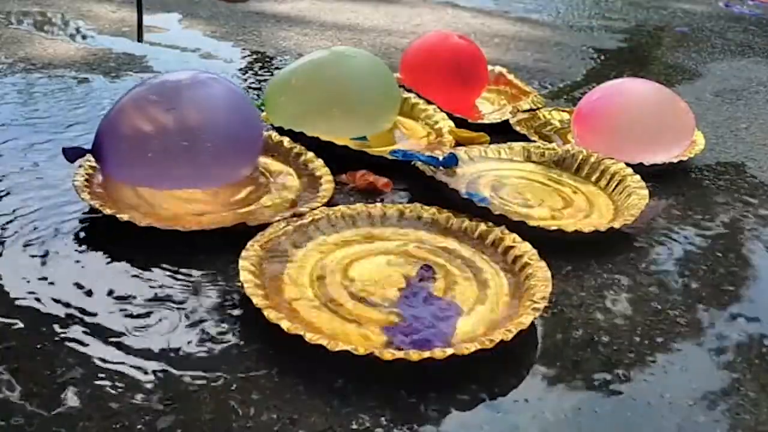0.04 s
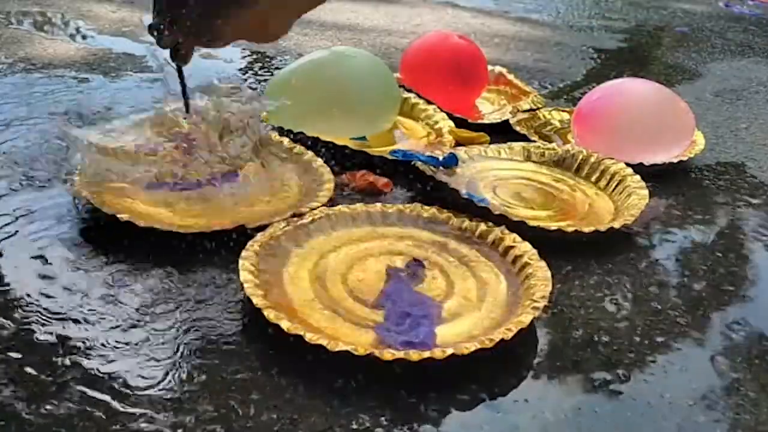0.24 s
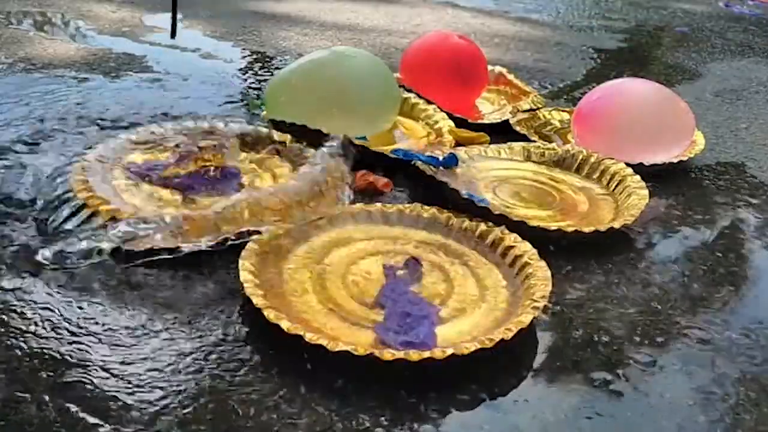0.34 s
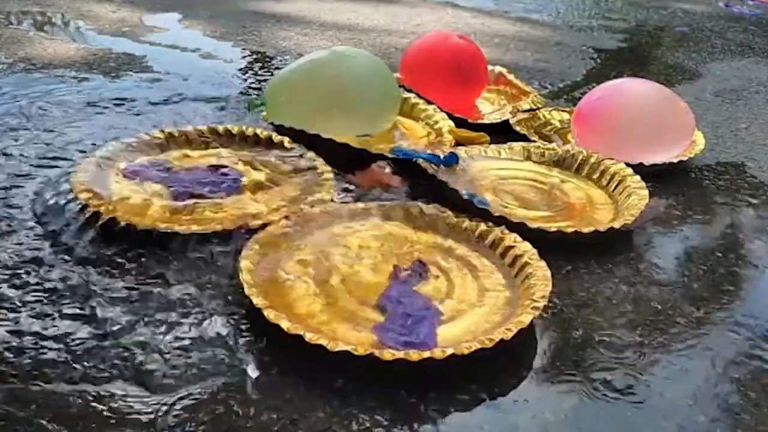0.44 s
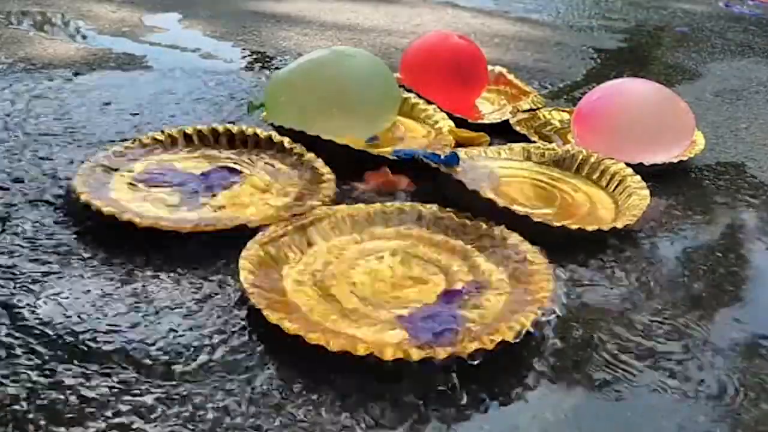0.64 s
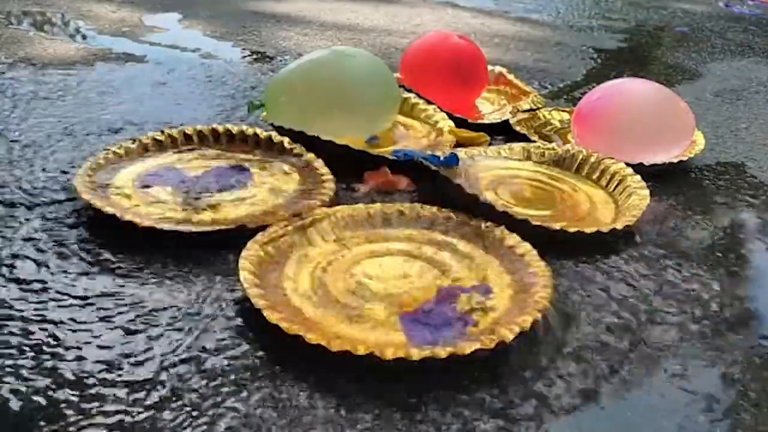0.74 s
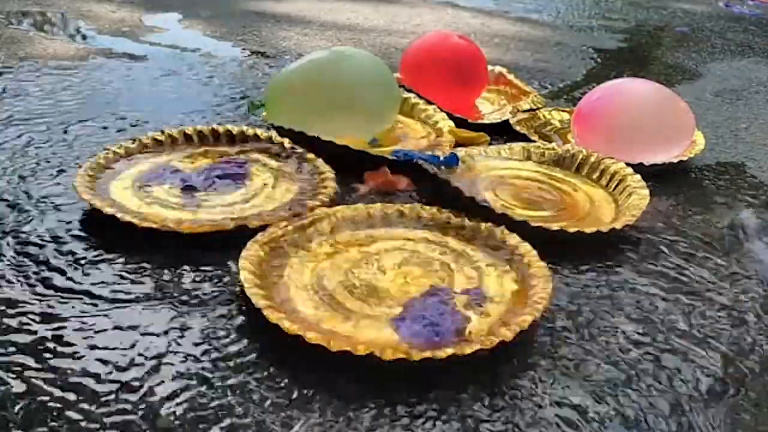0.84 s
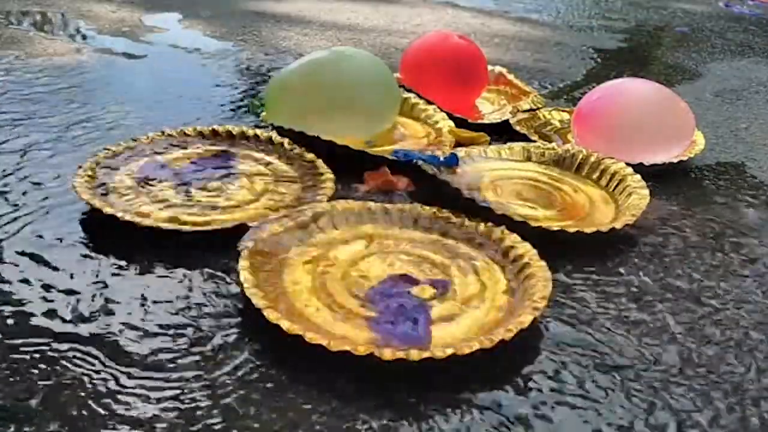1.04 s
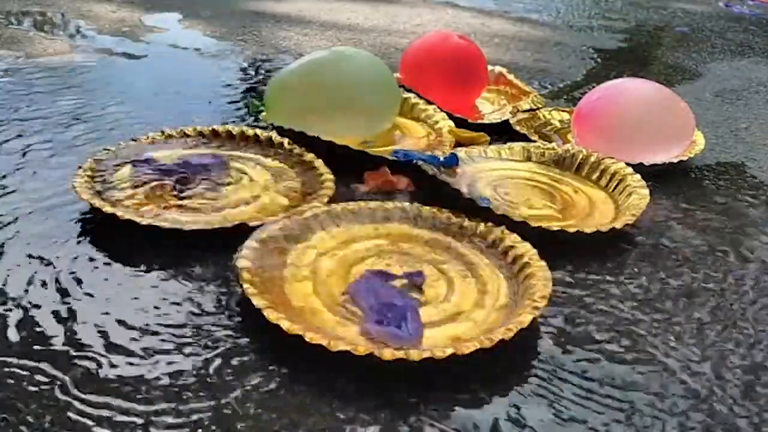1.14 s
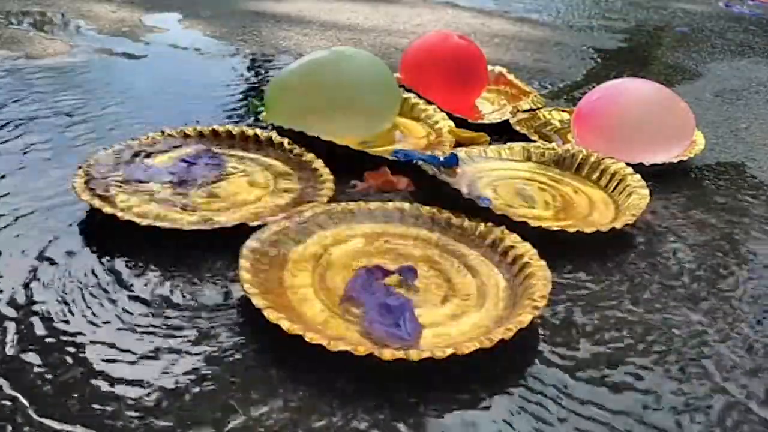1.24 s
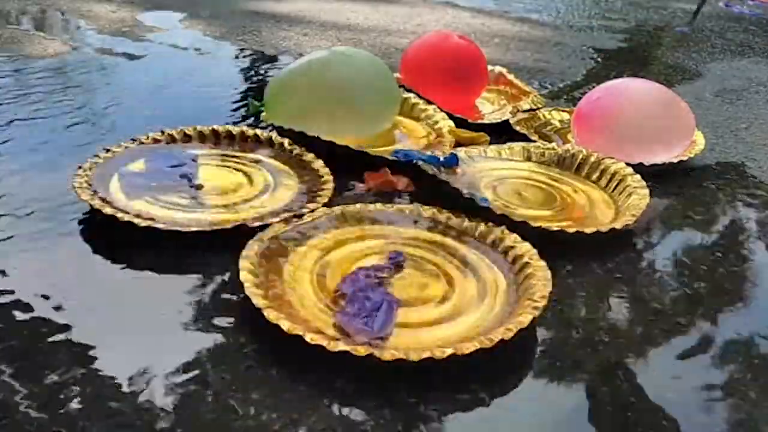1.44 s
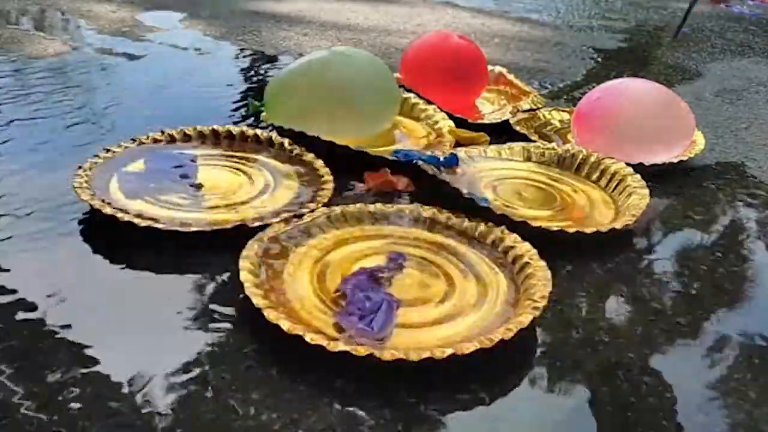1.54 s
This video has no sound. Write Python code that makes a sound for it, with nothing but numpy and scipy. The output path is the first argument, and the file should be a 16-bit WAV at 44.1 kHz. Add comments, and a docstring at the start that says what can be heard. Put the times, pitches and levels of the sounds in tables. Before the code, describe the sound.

A water balloon bursts with a sharp snap, water slapping a foil plate and wet pavement outdoors

```python
"""Low wind puffs over a faint outdoor rumble and hiss; then a water balloon pricked over a foil-paper plate.
The skin snaps (ringing cracks, spray and a thump), and water slaps plate and pavement in surges
(patchy noise plus a crowd of tiny rings). Trapped air plops and slaps ring as short gliding tones, fine
spray fizzes (noise), and droplets trickle away as ticks with puffs of noise. Two ports hear it close by."""
import sys
import numpy as np
from scipy import signal
from scipy.fft import rfft, irfft, next_fast_len
from scipy.io import wavfile
from scipy.ndimage import uniform_filter1d

SR = 44100
rng = np.random.default_rng(int(sys.argv[2]) if len(sys.argv) > 2 else 0)


def unload_audio(sound):
    """Save the sound as a 16-bit wav file, at the path given as the first command line argument."""
    columns = np.transpose(np.atleast_2d(sound))
    # keep every value between -1 and 1, then stretch to whole-number steps
    steps = np.round(np.clip(columns, -1, 1) * 32767)
    wavfile.write(sys.argv[1], SR, steps.astype(np.int16))


N = 70560

# Colours are relative: noise() scales to rms 1. Source levels are ahead of ports().
# Outdoor noise colour: [freq_hz, density_db_per_hz]
AIR_COLOUR = [(70, -25), (150, -5.5), (300, -12), (600, -17.5), (3300, -23.5), (9000, -33), (12800, -23),
              (15900, -33)]
# Outdoor port balance: [freq_hz, left_over_right_db]
AIR_BALANCE = [(100, 1), (8000, -2), (13000, 4)]
# Outdoor left-right likeness: [freq_hz, correlation]
AIR_ALIKE = [(150, 0.68), (1200, 0.065)]
AIR_DB = -51.5
# Wind puffs: [time_s, level_db]
WIND_LEVEL = [(0, -59), (.05, -48), (.13, -52), (.18, -62), (.4, -89), (.6, -59.5), (1.15, -66.5),
              (1.255, -48), (1.29, -53), (1.34, -52.5), (1.6, -61)]
# Wind puff colour: [freq_hz, density_db_per_hz]
WIND_COLOUR = [(25, -42), (85, 7), (250, -32.5)]

# Fine spray: [time_s, level_db]
FIZZ_LEVEL = [(.2, -63), (.5, -74), (.65, -48), (.8, -51.5), (1.05, -62.5), (1.6, -72)]
# Fine spray colour: [freq_hz, density_db_per_hz]
FIZZ_COLOUR = [(3000, -86), (6000, 1.5), (9000, -0.5), (16000, -8.5)]

# Late droplets landing: [start_s, level_db, pitch_hz]
DROPS = [(0.7513, -37.5, 13300), (0.7786, -36.5, 2100), (0.7977, -35, 7200), (0.918, -38, 2030),
         (0.9313, -39, 1420), (0.98, -39.5, 11200), (1.077, -40, 5960), (1.274, -40, 12300),
         (1.334, -44, 12400), (1.4196, -36, 2030)]
TICK_PEAK_S, TICK_DB, TICK_TILT_DB_PER_OCT = .0003, 1.5, -.8  # first contact; level over the row at 1 kHz
PUFF_RISE_S, PUFF_T60_AT_1KHZ_S = 0.0019, 0.026
PUFF_WIDTH_LN, PUFF_DB = 0.23, -7  # half width in ln(freq); level re the row

# Short tones, air pockets that plop and brief rings of the slaps:
# [start_s, pitch_hz, level_db, hold_s, pitch_rise_share]
TONES = [(.281, 1390, -33.5, 0.0042, -0.048), (.3755, 2750, -26, .008, 0.03),
         (0.371, 465, -35.5, 0.016, -0.04), (0.372, 807, -34.5, .006, -0.011),
         (0.4384, 887, -13, 0.0085, 0.178), (.439, 358.3, -33, 0.021, -0.0058),
         (.44, 591, -35.5, 0.024, 0.0042), (0.441, 1500, -28, 0.009, 0.08), (.456, 1480, -31, .012, -.04),
         (.462, 850, -32, 0.016, 0.25), (0.4905, 2330, -26.5, 0.004, 0.02), (.5, 1850, -30, .004, .01),
         (.485, 430, -41, .05, 0.26), (0.5455, 1720, -34, 0.009, 0.01), (.556, 792, -41.5, 0.0065, 0.0093),
         (.559, 1910, -34, 0.002, .04), (.585, 2650, -35, 0.003, 0.04), (.3037, 3450, -21.5, .001, 0.01)]
TONE_ATTACK_S, TONE_MIN_GLIDE_S = 0.00023, 0.0021
TONE_T60_CYCLES = 51  # cycles of the row's pitch to lose 60 dB after the hold
FLUTTER_SHARE, FLUTTER_HZ = .24, 250  # pockets deform as they ring

# Surges of falling water: [time_s, level_db]
SPLASH_LEVEL = [(.13, -58), (.218, -50.5), (.23, -27), (.25, -35.5), (.27, -35.5), (.3, -29), (.33, -32),
                (.36, -43.5), (.39, -37.5), (.43, -32.5), (.45, -38.5), (.476, -32.5), (.494, -29.5),
                (.515, -36), (.54, -40.5), (.555, -42), (.59, -43.5), (.8, -58.5), (1.6, -61)]
# Splash colour: [freq_hz, density_db_per_hz]
SPLASH_COLOUR = [(120, -48), (268, -25), (481, -8), (1270, -16.5), (3470, -3), (8830, -14.5),
                 (12500, -13.5), (15900, -35)]
GRAINS_PER_S, GRAIN_HZ, GRAIN_SPREAD_LN = 10000, 3600, .55
GRAIN_DECAY_CYCLES, GRAIN_SCATTER_DB, GRAIN_DB = 4, 2.5, -4.5  # decay to 1/e; level re the rush
CLUMP_DB, CLUMP_HZ = 1.8, 120  # droplets land in clumps: rms depth, speed limit

# Sharp bursts, tearing skin first, then slaps:
# [start_s, crack_level_db, tilt_db_per_octave, spray_level_db, spray_hold_s, spray_t60_s]
SNAPS = [(.2310, -5, .5, -20.5, .008, .035), (.3685, -11.5, -.5, -23, .005, .06),
         (.4382, -26, -2.5, -29, .004, .04)]
# Rings within a crack: [freq_hz, level_db, time_to_peak_s]
CRACK_RINGS = [(350, -24, .0015), (900, -13, .0008), (2800, -7, .0005), (4200, -2, .0004),
               (6500, -1, .0004), (9600, -4, .0003), (13000, -7, .0003)]
SPRAY_RISE_S, SPRAY_TILT_DB_PER_OCT = .0012, 2.8  # tilt added to the row's
THUMP_HZ, THUMP_DB, THUMP_T60_S = 127, -29, 0.03

# Near-water port balance: [freq_hz, left_over_right_db]
NEAR_BALANCE = [(60, 2), (500, 2.5), (7500, -1.5), (10400, 7.5), (15000, 25.5)]
# Near-water port phase: [freq_hz, left_lead_rad]
NEAR_PHASE = [(20, 0.32), (860, 0.73), (2330, 0.44), (4650, 6.43), (7240, 19.9), (15600, 27.4)]
# Near-water left-right likeness: [freq_hz, correlation]
NEAR_ALIKE = [(100, 0.077), (600, 0.82), (2500, 0.057), (10000, 0.2)]
TOP_HZ = 15900


def amp(db):
    """Decibels to linear gain."""
    return 10 ** (np.asarray(db) / 20)


def unit(x):
    """Scale to rms 1 over the whole array."""
    return x / np.sqrt(np.mean(x ** 2) + 1e-20)


def along(points, hz):
    """Interpolate (freq_hz, value) points on a log axis."""
    f, v = np.transpose(points)
    return np.interp(np.log(hz + 1), np.log(f + 1), v)


def curve(rows):
    """Interpolate (time_s, value) rows to one value per sample."""
    return np.interp(np.arange(N) / SR, *np.transpose(rows))


def filtered(x, response):
    """Multiply the spectrum of x by a response of frequency."""
    n = x.shape[-1]
    m = next_fast_len(n + 8192)
    return irfft(rfft(x, m) * response(np.fft.rfftfreq(m, 1 / SR)), m)[..., :n]


def noise(colour, size, patchy_db=0., tilt_db=0.):
    """Two unrelated coloured noises, joint rms 1, sharing time-frequency patches of random gain."""
    z = signal.stft(rng.standard_normal((2, size)), nperseg=256)[2]
    field = uniform_filter1d(rng.standard_normal(z.shape[1:]), size=4, axis=0)
    field = uniform_filter1d(field, size=4, axis=1)
    pair = signal.istft(z * amp(patchy_db * unit(field)), nperseg=256)[1][:, :size]

    def response(hz):
        return amp(along(colour, hz) + tilt_db * np.log2(hz / 4000 + 0.018))

    return unit(filtered(pair, response))


def add(out, x, start_s):
    """Mix x into out from start_s."""
    k = round(start_s * SR)
    out[..., k:k + x.shape[-1]] += x[..., :N - k]


def ports(pair, alike, balance, phase):
    """Two microphone ports hear a common and an opposed part, each port with its own gain and phase."""
    side = np.array([[1], [-1]])

    def share(hz):
        angle = np.arccos(np.clip(along(alike, hz), -1, 1)) / 2
        return np.array([np.cos(angle), np.sin(angle)])

    def port_response(hz):
        gain = amp(side * along(balance, hz) / 2)
        return gain * np.exp(.5j * side * along(phase, hz))

    common, opposed = filtered(pair, share)
    return filtered(common + side * opposed, port_response)


def outdoors():
    """Steady hiss and low outdoor rumble, plus wind puffs that are stronger in the left port."""
    air = ports(noise(AIR_COLOUR, N, patchy_db=1.85), AIR_ALIKE, AIR_BALANCE, [(20, 0.035)])
    wind = ports(noise(WIND_COLOUR, N), [(20, 0.45)], [(20, 5.1)], [(20, 0)])
    return amp(AIR_DB) * air + amp(curve(WIND_LEVEL)) * wind


def fizz():
    """Fine spray: patchy high noise that swells late and settles slowly."""
    return amp(curve(FIZZ_LEVEL)) * noise(FIZZ_COLOUR, N, patchy_db=3.5)


def drops():
    """Each droplet is a short tick at its pitch and a soft noise puff around it; high puffs last longer."""
    out, t = np.zeros((2, N)), np.arange(SR // 16) / SR
    for start_s, level_db, pitch_hz in DROPS:
        puff = filtered(rng.standard_normal((2, len(t))),
                        lambda f: 1 / (1 + (np.log(f / pitch_hz + 1e-9) / PUFF_WIDTH_LN) ** 4))
        t60_s = PUFF_T60_AT_1KHZ_S * np.sqrt(pitch_hz / 1000)
        shape = amp(level_db + PUFF_DB - 60 * t / t60_s) * (1 - np.exp(-t / PUFF_RISE_S))
        add(out, shape * unit(puff), start_s)
        tick_db = level_db + TICK_DB + TICK_TILT_DB_PER_OCT * np.log2(pitch_hz / 1000)
        tick_shape = amp(tick_db) * t / TICK_PEAK_S * np.exp(1 - t / TICK_PEAK_S)
        add(out[0], tick_shape * np.sin(2 * np.pi * pitch_hz * t), start_s)
    return out


def plops_and_slap_rings():
    """Each air pocket or slap rings as one fluttering tone that glides, holds and dies."""
    out, t = np.zeros((2, N)), np.arange(SR // 5) / SR
    for start_s, pitch_hz, level_db, hold_s, rise_share in TONES:
        glide_s = max(TONE_MIN_GLIDE_S, hold_s / 2)
        freq_hz = pitch_hz * (1 + rise_share * (1 - np.exp(-t / glide_s)))
        phase_rad = 2 * np.pi * np.cumsum(freq_hz) / SR
        decay_db = 60 * np.maximum(t - hold_s, 0) * pitch_hz / TONE_T60_CYCLES
        shape = (1 - np.exp(-t / TONE_ATTACK_S)) * amp(level_db - decay_db)
        slow = filtered(rng.standard_normal((2, len(t))), lambda f: 1 / (1 + (f / FLUTTER_HZ) ** 2))
        in_phase, quadrature = FLUTTER_SHARE * unit(slow)
        tone = (1 + in_phase) * np.sin(phase_rad) + quadrature * np.cos(phase_rad)
        add(out[0], shape * tone, start_s)
    return out


def splash():
    """Patchy rush with a crowd of tiny ringing droplets, both following the surges."""
    count, length = int(GRAINS_PER_S * N / SR), 400
    u = rng.random((count, 3))  # columns: start, size, lean
    spread = np.exp(GRAIN_SPREAD_LN * rng.standard_normal((count, 1)))
    freq_hz = np.clip(GRAIN_HZ * spread, 900, 15000)
    t = np.arange(length) / SR
    size = amp(-GRAIN_SCATTER_DB * np.log(u[:, 1:2] + 0.0004))
    shape = np.exp(-freq_hz * t / GRAIN_DECAY_CYCLES) * (1 - np.exp(-freq_hz * t))
    rings = size * shape * np.sin(2 * np.pi * freq_hz * t)
    at = (u[:, :1] * N).astype(int) + np.arange(length)
    lean_rad = 2 * np.pi * u[:, 2:]  # split between the common and opposed parts
    grains = np.array([np.bincount(at.ravel(), (rings * w).ravel(), N + length)[:N]
                       for w in (np.cos(lean_rad), np.sin(lean_rad))])
    clumps = amp(CLUMP_DB * unit(filtered(rng.standard_normal(N), lambda f: f < CLUMP_HZ)))
    rush = noise(SPLASH_COLOUR, N, patchy_db=5.0)
    return amp(curve(SPLASH_LEVEL)) * (rush + amp(GRAIN_DB) * unit(clumps * grains))


def snaps():
    """Each burst is a crack of brief rings with a short cloud of spray; the first also thumps."""
    out, t = np.zeros((2, N)), np.arange(SR // 8) / SR
    for start_s, crack_db, tilt_db, spray_db, hold_s, t60_s in SNAPS:
        crack = np.zeros(len(t))
        for freq_hz, level_db, peak_s in CRACK_RINGS:
            gain = amp(level_db + tilt_db * np.log2(freq_hz / 4000))
            crack += gain * t / peak_s * np.exp(1 - t / peak_s) * np.sin(2 * np.pi * freq_hz * t)
        add(out[0], amp(crack_db) * crack, start_s)
        decay_db = 60 * np.maximum(t - hold_s, 0) / t60_s
        shape = (1 - np.exp(-t / SPRAY_RISE_S)) * amp(spray_db - decay_db)
        spray = noise(SPLASH_COLOUR, len(t), patchy_db=-2.5, tilt_db=tilt_db + SPRAY_TILT_DB_PER_OCT)
        add(out, shape * spray, start_s)
    thump = amp(THUMP_DB - 60 * t / THUMP_T60_S) * np.sin(2 * np.pi * THUMP_HZ * t)
    add(out[0], thump, SNAPS[0][0])
    return out


def scene():
    """Near water through the two ports, over the outdoor background."""
    water = fizz() + drops() + plops_and_slap_rings() + splash() + snaps()
    return outdoors() + ports(water, NEAR_ALIKE, NEAR_BALANCE, NEAR_PHASE)


def record(dry):
    """The phone keeps nothing from its band limit up."""
    return filtered(dry, lambda hz: hz < TOP_HZ)


dry = scene()
out = record(dry)
unload_audio(out)
```